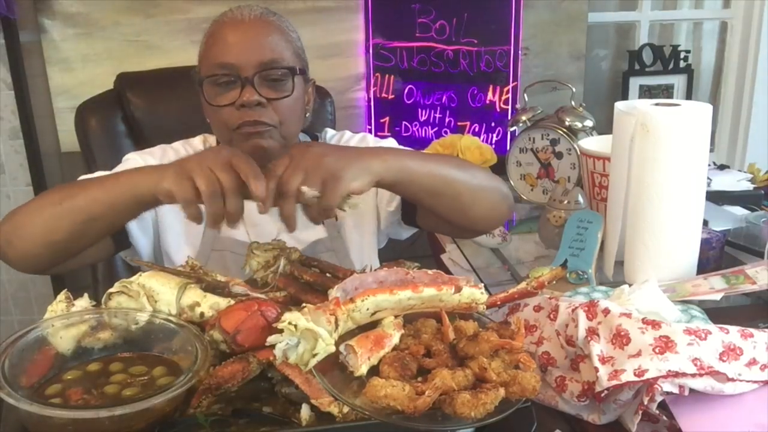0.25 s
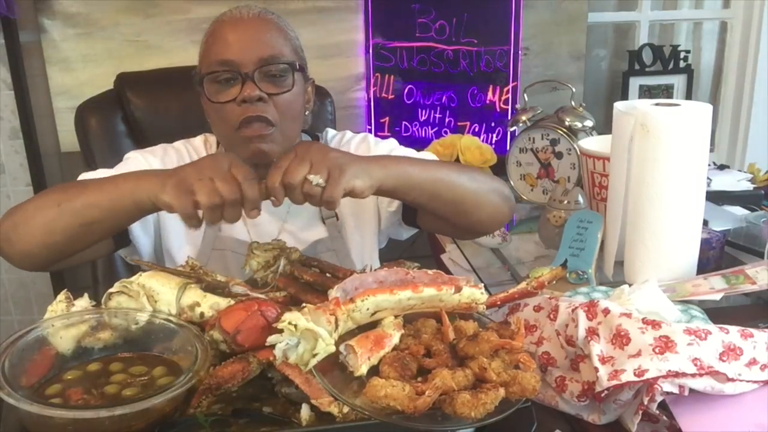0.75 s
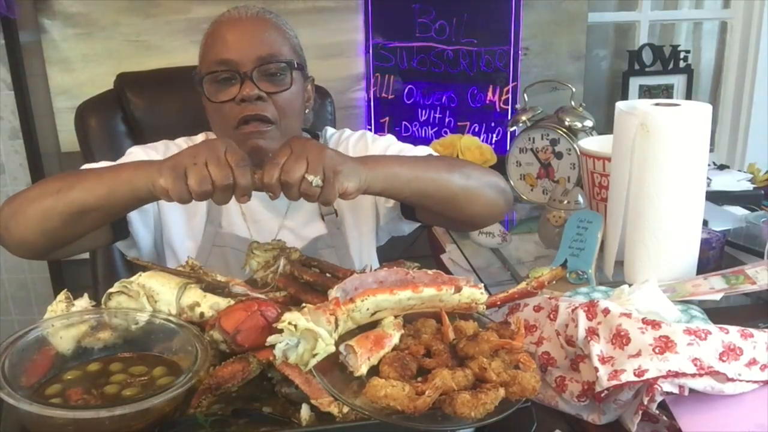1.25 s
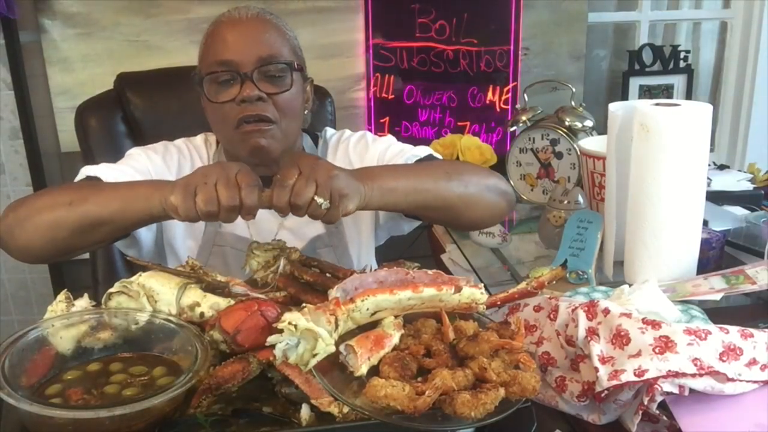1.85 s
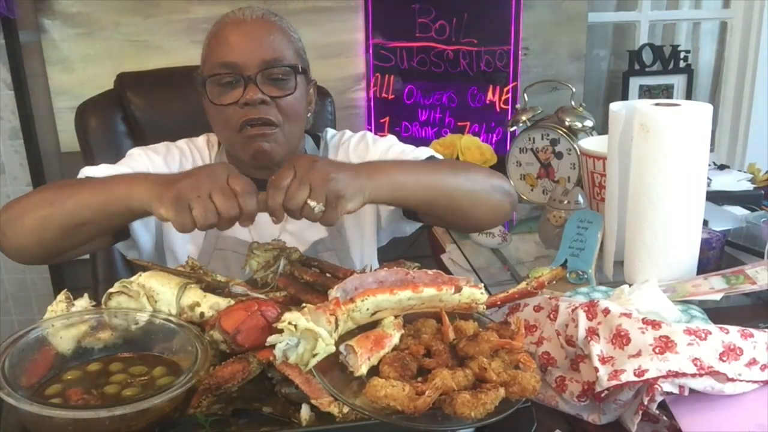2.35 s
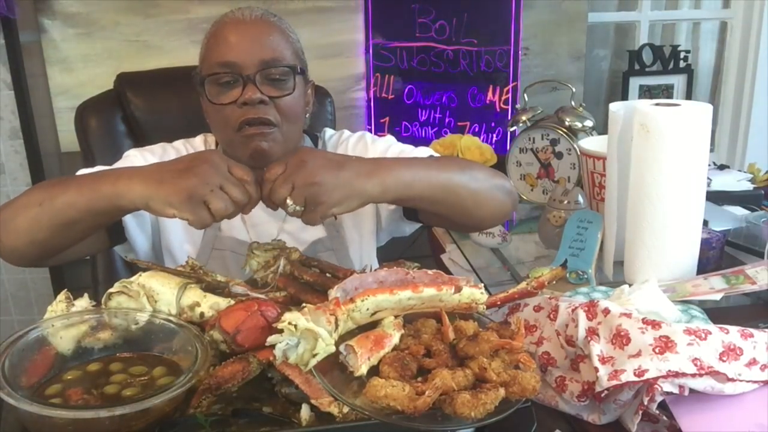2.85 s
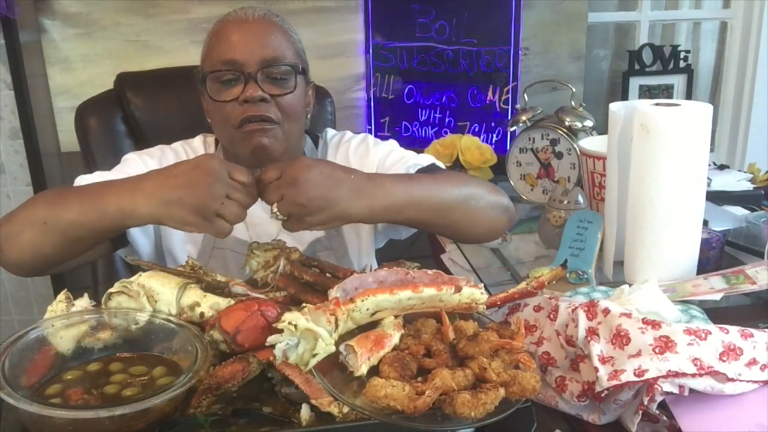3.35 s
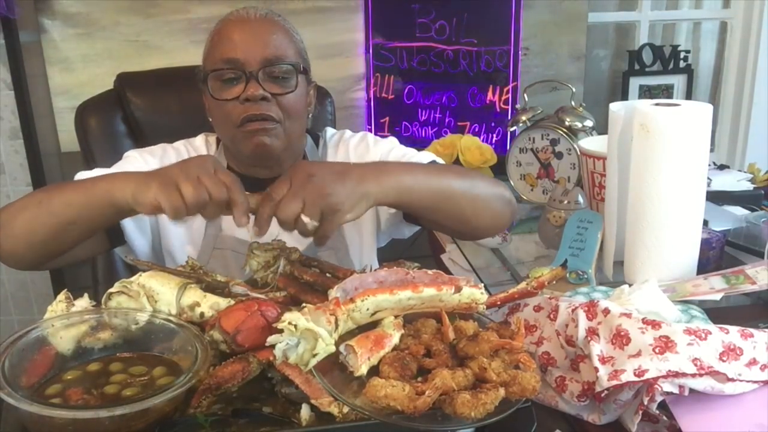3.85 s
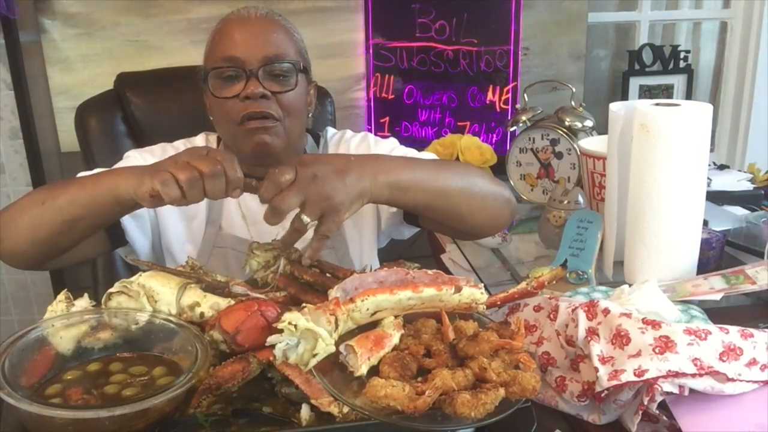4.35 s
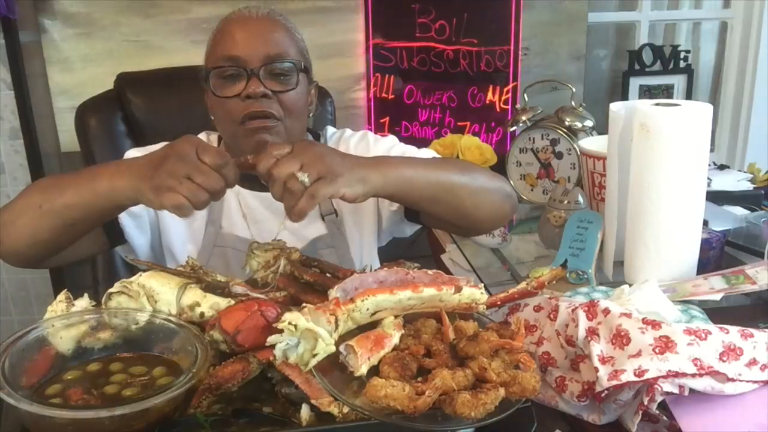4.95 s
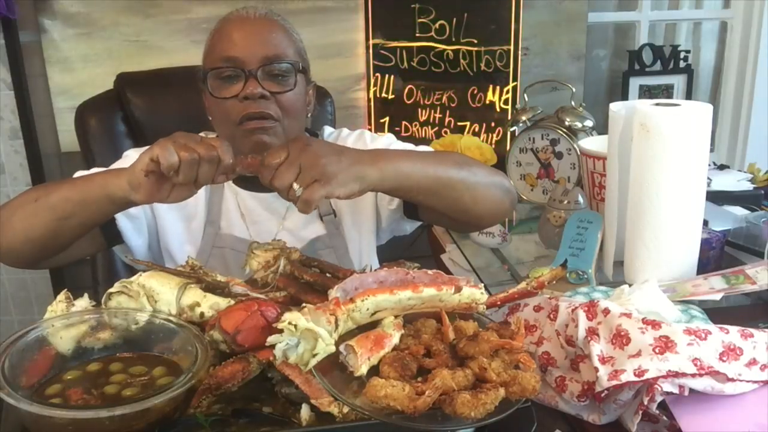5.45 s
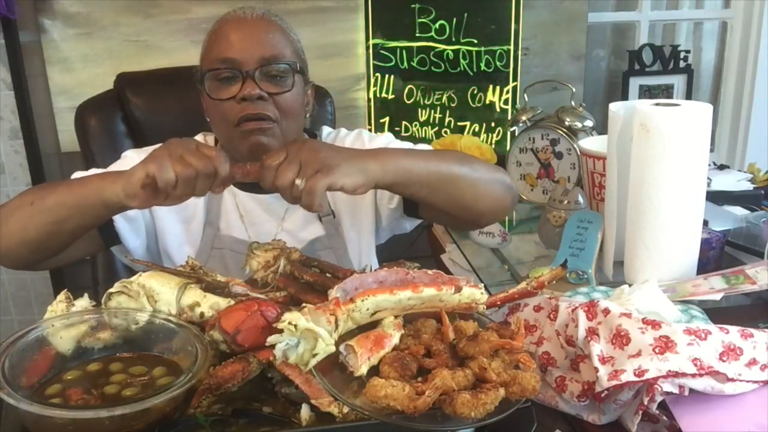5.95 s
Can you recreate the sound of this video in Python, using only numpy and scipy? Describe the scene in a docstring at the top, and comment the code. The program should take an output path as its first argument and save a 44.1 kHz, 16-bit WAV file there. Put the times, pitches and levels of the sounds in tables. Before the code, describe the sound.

A steady low hum with a slow throb sits under soft rumble and air. Small dull pops patter irregularly, singly and in quick runs, with faint hollow knocks. Close up, hard shell ticks and cracks, bursts into a single sharp snap near the two-second mark, then splinters more softly. The lively small room gives the snap a short bright tail. Weak crackles return near the end, and a distant bird chirps barely audibly.

```python
"""Crab leg cracked by hand

A crab leg is bent by hand until its shell ticks, snaps once loudly and is pulled apart.
Each crack is a rush of tiny tears that rings the leg, and the hard-walled room rings after it.
Behind it hum tones beat over a rumble and airy noise, and short blips patter like a simmering pot
among faint hollow knocks. A far bird gives a few faint chirps, made of tones that slide upward."""
import sys
import numpy as np
from scipy import signal
from scipy.fft import rfft, irfft
from scipy.io import wavfile
from scipy.ndimage import uniform_filter1d

SR = 44100
rng = np.random.default_rng(int(sys.argv[2]) if len(sys.argv) > 2 else 0)


def transcribe(u):
    """Save the signal u as a 16-bit wav file named by the first command-line argument.

    u: samples, shape (n,) or (channels, n), limited to [-1, 1]; the rate is SR.
    q: integer samples, one column per channel.
    """
    v = np.clip(np.atleast_2d(u).T, -1, 1)
    q = np.round(v * 32767).astype(np.int16)
    wavfile.write(sys.argv[1], SR, q)


N = 272979  # length in samples
T = np.arange(N) / SR  # time in s
BINS = np.fft.rfftfreq(4096, 1 / SR)  # frequencies in Hz at which filters are drawn

# Cracks of the shell, the big snap among them; shell() raises all levels alike:
# t/s, body level/dB, edge level/dB, splinter level/dB, ring of the broken piece f/Hz
CRACKS = [(0.7169,-53,-55,-74,4400), (0.8066,-40,-45,-48.5,3600), (0.8104,-43,-60,-65,3220),
          (1.6365,-32,-39,-37.5,3740), (1.677,-45,-49,-62,4220), (1.7884,-48,-47.5,-47,4200),
          (1.8487,-39.5,-43,-48,4150), (1.854,-40,-35.5,-45,4340), (1.902,-30,-46.5,-60.5,3156),
          (1.9019,-45.5,-71,-31.5,15200), (1.955,-45,-55,-66,3520), (2.11,-50,-48,-58,3200),
          (2.116,-42,-41,-36,6520), (2.1383,-33,-34,-38,6400), (2.1458,-14,-12,-22.5,3120),
          (2.568,-39,-38.5,-42.5,4660), (2.7061,-47.5,-46,-43,6030), (2.8006,-46,-44.5,-41.5,3360),
          (2.8901,-37.5,-37.5,-36,5040), (3.1932,-63,-54.5,-64,5185), (5.5076,-42.5,-50.5,-73,4080),
          (6.0256,-45,-60,-76.5,3890), (6.177,-44.5,-49.5,-48.5,3290)]
# The body, edge and splinter bands of a crack: lower f/Hz, upper f/Hz
CRACK_BANDS = [(2400, 4600), (4600, 9500), (9500, 16000)]
# Basic colour of breaking shell, before the bands are set: f/Hz, relative level/dB per Hz
SHELL = [(250, -33.5), (450, -32), (750, -15.5), (1200, -16), (1600, -10.5), (2200, -2), (3400, -3),
         (5000, -5), (7000, -1.5), (10000, -9.5), (14500, -12), (16500, -18)]
# Ring of the hollow leg: f/Hz, width f/Hz, boost level/dB
RING = [(4030, 940, 4), (6900, 380, 0), (11060, 230, -1)]
# A usual tiny tick of rubbing shell: body level/dB, edge level/dB, splinter level/dB
CRUMB_DB = (-75, -71.5, -73.5)

# The clear single pops; pop() shifts the level: t/s, blip level/dB, pitch f/Hz
POPS = [(0.0264,-20.5,1550), (0.1491,-32.5,1660), (0.383,-39,1790), (0.3939,-30,1750), (0.57,-34,1480),
        (1.261,-39,1580), (1.6296,-33,1920), (1.6366,-31.5,2005), (1.7856,-33,1810), (2.0503,-36.5,1540),
        (2.1138,-27,1800), (2.5077,-28,1640), (2.707,-40,1620), (2.997,-31,1570), (3.5213,-36.5,1566),
        (3.565,-33,1700), (3.7351,-34.5,1666), (3.9404,-36,1430), (4.0768,-31.5,1554), (5.1172,-35.5,1765),
        (5.385,-33,1506), (5.5196,-36.5,1733), (5.8868,-36.5,1824), (5.9927,-31,1810), (6.0534,-29,1546)]
# Flurries, quick runs of pops; pop() shifts the levels:
# start t/s, length t/s, blip level/dB, low knock level/dB
FLURRIES = [(.019,0.07,-44.5,-51), (.249,0.023,-36.5,-60), (.525,.015,-42,-44), (0.714,0.0091,-34,-30.5),
            (1.058,0.034,-33,-33), (1.382,0.014,-43,-48), (1.436,.025,-38,-47), (1.682,0.039,-37.5,-39.5),
            (1.815,0.027,-41.5,-42.5), (2.096,0.019,-34,-38.5), (2.309,0.034,-36.5,-40.5),
            (2.412,0.014,-35,-54), (2.626,0.044,-40,-36.5), (2.731,0.032,-44.5,-57),
            (3.154,0.053,-49.5,-48.5), (3.344,0.054,-44,-53), (4.154,0.0231,-48,-36), (4.427,0.016,-39,-45),
            (4.529,0.1,-43.5,-45.5), (5.006,0.019,-37.5,-36), (5.152,.015,-39.5,-46.5),
            (5.303,0.038,-35.5,-41.5), (5.43,0.018,-40,-37), (5.697,0.011,-38,-52.5)]
# The faint tick that opens a flurry: body level/dB, edge level/dB, splinter level/dB
FLURRY_TICK_DB = (-58, -66, -72)
# Colour of the small pops: f/Hz, relative level/dB per Hz
PATTER_COLOUR = [(150, -32), (330, 0), (480, -9), (620, 4.5), (850, -7), (1020, 1.5), (1170, -12.5),
                 (1500, 6), (2000, -3.5), (2400, -5), (2900, -20), (4200, -20), (8000, -32), (16000, -51.5)]
# The clearest hollow knocks: t/s, level/dB before the soft onset and fade, pitch f/Hz
KNOCKS = [(1.11,-43.5,401), (2.325,-45,620), (2.746,-46.5,323), (4.171,-49,560), (4.436,-46,377),
          (4.687,-44.5,333), (5.429,-40.5,1030)]
# Bird chirps; scene() lowers all of them alike: t/s, level/dB
CHIRPS = [(1.72, -49.5), (2.05, -47.5), (2.985, -50.5), (3.315, -51.5), (3.655, -50)]

# How long the room rings at each pitch, down to -60 dB: f/Hz, t/s
ROOM_T60 = [(300, 0.27), (1500, 0.23), (3200, .5), (7000, .52), (10000, .38), (16000, 0.5)]
# Colour of the room's tail at its start: f/Hz, relative level/dB
ROOM_COLOUR = [(300, -5.5), (1500, -2), (2300, -6), (3200, -2), (4500, -2), (7000, -4), (9000, 0),
               (16000, 1)]
# Echoes from the table and near walls: delay t/s, gain
ECHOES = [(.0092, .15), (.011, 0.2), (.0178, .08), (.0203, .09)]
# Colour of the low rumble: f/Hz, relative level/dB per Hz
RUMBLE = [(25, -18.5), (45, -7.5), (70, 1), (100, -2.5), (150, -2), (200, -6.5), (260, -21), (500, -44)]
# Colour of the airy background noise: f/Hz, relative level/dB per Hz
AIR = [(150, -33.5), (260, 2), (400, 3.5), (650, -2), (1100, -5.5), (1600, -5.5), (2050, -5.5), (2800, -10),
       (4500, -14), (7000, -14), (10300, -23), (12000, -21), (16000, -31)]

POP_LOW_DB = -15.5  # low knock under a single pop against its blip, before pop() shifts both
BLIP_HZ, BLIP_SPREAD_HZ = 1700, 170  # usual pitch of a pop, and its scatter
FLURRY_GAP_S, FLURRY_JITTER_S = 0.013, .002  # spacing of the pops in a run, and its unevenness
FLURRY_SPREAD_DB = 1  # how unequal the pops in a run are
PATTER_DB = -57  # middle level of the fine patter
PATTER_SWELL_DB, PATTER_SWELL_HZ = 4.5, 12  # how strongly and how fast it comes and goes
PATTER_LIFT_DB, PATTER_LIFT_S = 5.5, 0.02  # rise around a flurry, and extra reach on each side
HUM_HZ, HUM_DB = 119.8, -42.5  # twice the mains frequency; rms level without waver and beat
BEAT_HZ, BEAT_DB = 1.155, -14.5  # the motor's slip, and the level of its tone under the hum
BEAT_PEAK_S = 0.44  # a moment when the beat is loudest
AIR_DB = -60.5  # rms level
EDGE_HZ = 16000  # top of the final sound


def shell(crack_db=1.5, splinter_db=-15, splinter_wait=.025, give_db=-23):
    """The shell gives a little just before each crack, and sheds two splinters after it."""
    out = np.zeros(N)
    for s, *levels_db, piece_hz in CRACKS:
        add(out, s, amp(crack_db) * fracture(levels_db, piece_hz))
        small_db = np.minimum(levels_db, -33)
        give_s = s - rng.uniform(0.0011, .0018)
        add(out, give_s, amp(give_db) * fracture(small_db, piece_hz))
        for wait in rng.exponential(splinter_wait, size=2):
            size_db = small_db + 2 * rng.standard_normal(len(small_db))
            splinter = fracture(size_db, rng.uniform(4600, 18000), t60=0.0064)
            add(out, s + wait, amp(splinter_db) * splinter)
    return out


def fracture(levels_db, piece_hz, t60=.014, first_db=4, span=0.0042, piece_db=7.5, piece_q=6):
    """One break and a dying rush of tiny tears ring the leg and the broken piece."""
    t = np.arange(2048) / SR
    tears = rng.standard_normal(len(t))
    tears[0] = amp(first_db)  # the first break
    tears = tears * amp(-60 * t / t60)
    power = abs(rfft(tears, 2 * len(t))) ** 2
    modes = [*RING, (piece_hz, piece_hz / piece_q, piece_db)]
    ringing = sum(db / (1 + (2 * (BINS - hz) / width) ** 2) for hz, width, db in modes)
    colour = read(SHELL, BINS) + ringing
    # even out the random colour of the tears: the tearing itself has no pitch
    colour = colour - 10 * np.log10(uniform_filter1d(power, size=35))
    # bring each band to its level, as if its energy were spread over the span in s
    bins_power = power * amp(colour) ** 2
    energy = [bins_power[(BINS > lo) & (BINS < hi)].sum() / len(t) for lo, hi in CRACK_BANDS]
    lift_db = np.array(levels_db) - 10 * np.log10(np.array(energy) / (span * SR))
    band_centres = np.mean(CRACK_BANDS, axis=1)
    colour = colour + read(np.column_stack([band_centres, lift_db]), BINS)
    return signal.fftconvolve(tears, causal(colour))


def crumbs(per_s=16, spread_db=3, coarse_per_s=2.5, coarse_db=(-58, -62, -70)):
    """Tiny ticks of shell rubbing between the fingers, now and then a coarser one."""
    out = np.zeros(N)
    for rate, usual_db in [(per_s, CRUMB_DB), (coarse_per_s, coarse_db)]:
        draws = rng.random((200, 5))[:int(rate * N / SR)]
        for slot, (place, piece, *bands) in enumerate(draws):
            # the root of 12 makes spread_db the standard deviation of an even draw
            size_db = spread_db * np.sqrt(12) * (np.array(bands) - .5) + usual_db
            tick = fracture(size_db, 3000 + 5800 * piece, t60=0.0077)
            add(out, (slot + place) / rate, tick)
    return out


def simmer(stray_db=-44, stray_low_db=-49, stray_spread_db=1.0, count=26):
    """Clear single pops, quick runs of them, and soft strays in between."""
    out = np.zeros(N)
    for s, db, pitch_hz in POPS:
        add(out, s, pop(db, pitch_hz, db + POP_LOW_DB))
    for slot, (size, pitch, low) in enumerate(rng.standard_normal((count, 3))):
        stray = pop(stray_db + stray_spread_db * size,
                    BLIP_HZ + BLIP_SPREAD_HZ * pitch,
                    stray_low_db + stray_spread_db * low)
        add(out, (slot + rng.random()) * N / SR / count, stray)
    for start, length, db, low_db in FLURRIES:
        add(out, start, fracture(FLURRY_TICK_DB, rng.uniform(2700, 4400), t60=0.023))
        for step, (late, size, pitch, low) in enumerate(rng.standard_normal((12, 4))):
            sound = pop(db + FLURRY_SPREAD_DB * size,
                        BLIP_HZ + BLIP_SPREAD_HZ * pitch,
                        low_db + FLURRY_SPREAD_DB * low)
            if step * FLURRY_GAP_S < length:
                add(out, start + step * FLURRY_GAP_S + FLURRY_JITTER_S * late, sound)
    return out


def pop(db, pitch_hz, low_db, pop_db=2.0, knock_db=-1):
    """One pop: a short blip over a lower knock."""
    high = amp(db + pop_db) * blip(pitch_hz, width_hz=490)
    low = amp(low_db + knock_db) * blip(rng.uniform(500, 850), width_hz=520)
    return high + low


def blip(hz, width_hz, top_hz=2400):
    """A dull, short ring around one pitch, with little treble and a peak of 1."""
    resonance = 1 + (2 * (BINS - hz) / width_hz) ** 4
    treble_cut = 1 + (BINS / top_hz) ** 14
    bass_cut = BINS / (BINS + hz)
    shape = bass_cut / np.sqrt(resonance * treble_cut)
    sound = causal(20 * np.log10(shape + 1e-6))
    return sound / abs(sound).max()


def patter(per_s=200, spread_db=4, ragged_db=4, detune=0.081):
    """Small pops, each kind coloured a little differently, thicken around the flurries."""
    fine, count = np.zeros(N), 24  # count: kinds of pop
    for scale in np.exp(np.linspace(-detune, detune, count)):
        rough = uniform_filter1d(rng.standard_normal(len(BINS)), size=10)
        ripple = unit(uniform_filter1d(rough, size=6))
        sizes = amp(spread_db * np.minimum(rng.exponential(1, N), 2.5))
        clicks = sizes * (rng.random(N) < per_s / count / SR)
        colour = read(PATTER_COLOUR, BINS * scale) + ragged_db * ripple
        fine += signal.oaconvolve(clicks, causal(colour))[:N]
    fine = unit(fine)
    # dividing by the recent loudness makes the patter more even
    loudness = np.sqrt(abs(uniform_filter1d(fine ** 2, size=2000)) + 0.099)
    busy = sum(np.exp(-((T - start - length / 2) / (length / 2 + PATTER_LIFT_S)) ** 2)
               for start, length, *_ in FLURRIES)
    swell_db = PATTER_SWELL_DB * drift(PATTER_SWELL_HZ)
    level_db = PATTER_DB + swell_db + PATTER_LIFT_DB * np.minimum(busy, 1)
    return amp(level_db) * fine / loudness


def knocks(t60=0.12, rise=0.0018, faint_db=-13):
    """Each knock is one low, briefly ringing tone; every flurry sets off a faint one too."""
    out, t = np.zeros(N), np.arange(SR // 4) / SR
    faint = [(start + length / 2, low_db + faint_db, rng.uniform(320, 720))
             for start, length, _, low_db in FLURRIES]
    for s, db, hz in KNOCKS + faint:
        envelope = amp(db - 60 * t / t60) * (1 - np.exp(-t / rise))
        add(out, s, envelope * np.sin(2 * np.pi * hz * t))
    return out


def bird(start_hz=2230, end_hz=2540, length=0.098):
    """Each chirp is a tone sliding upward, at a slightly different pitch each time."""
    out = np.zeros(N)
    slide = np.linspace(start_hz, end_hz, round(length * SR))
    for s, db in CHIRPS:
        hz = slide * (1 + 0.0053 * rng.standard_normal())
        tone = np.sin(2 * np.pi * np.cumsum(hz) / SR)
        add(out, s, amp(db) * tone * np.hanning(len(hz)))
    return out


def room(x, wet_db=-4, gap=0.003):
    """A few near echoes and a dense tail that dies at its own pace at each pitch."""
    hz, t, z = signal.stft(rng.standard_normal(SR), SR, nperseg=256)
    fall_db = -60 * t / read(ROOM_T60, hz)[:, None]
    tail = signal.istft(z * amp(fall_db + read(ROOM_COLOUR, hz)[:, None]), SR, nperseg=256)[1]
    # the tail grows in over the first gap seconds
    tail = tail * np.clip(np.arange(len(tail)) / SR / gap, 0, 1) ** 2
    tail = amp(wet_db) * tail / np.linalg.norm(tail)
    for delay, gain in ECHOES:
        add(tail, delay, np.array([gain]))
    return signal.fftconvolve(x, tail)[:N]


def appliance(mains_db=-63, waver_db=0.78, rumble_db=-54):
    """A motor slips just behind the mains hum, so the two beat slowly over its rumble."""
    slipping = amp(BEAT_DB) * np.exp(-2j * np.pi * BEAT_HZ * (T - BEAT_PEAK_S))
    both_tones = ((1 + slipping) * np.exp(2j * np.pi * HUM_HZ * T)).imag
    hum = amp(HUM_DB + waver_db * drift(6.9)) * both_tones
    mains = amp(mains_db) * np.sin(np.pi * HUM_HZ * T)  # half the hum's pitch
    # the root of 2 turns rms levels into sine peaks
    return np.sqrt(2) * (hum + mains) + amp(rumble_db) * noise(RUMBLE)


def noise(points):
    """Steady noise of rms 1 with a given spectrum."""
    gain = amp(read(points, np.fft.rfftfreq(N, 1 / SR)))
    return unit(irfft(rfft(rng.standard_normal(N)) * gain, N))


def drift(rate_hz):
    """Slow random wander of rms 1: noise with everything faster than rate_hz weakened."""
    slowing = 1 + (np.fft.rfftfreq(N, 1 / SR) / rate_hz) ** 4
    return unit(irfft(rfft(rng.standard_normal(N)) / slowing, N))


def causal(db, size=2048):
    """The sharp-fronted (minimum-phase) impulse response with this gain in each bin."""
    log_gain = np.log(amp(np.maximum(db, db.max() - 90)))
    circle = np.concatenate([log_gain, log_gain[-2:0:-1]])
    return np.fft.ifft(np.exp(np.conj(signal.hilbert(circle)))).real[:size]


def read(points, hz):
    """Joins (Hz, value) points by lines on a log-frequency axis."""
    f, value = np.transpose(points)
    return np.interp(np.log(hz + 1), np.log(f + 1), value)


def amp(db):
    """Decibels to gain."""
    return 10 ** (np.asarray(db) / 20)


def unit(x):
    """Scales to rms 1."""
    return x / np.sqrt(np.mean(x ** 2) + 1e-20)


def add(mix, s, sound):
    """Mixes a sound in at time s in seconds."""
    part = mix[max(round(s * SR), 0):][:len(sound)]
    part += sound[:len(part)]


def scene(pop_room_db=-8, bird_db=-4):
    """Shell, pops and bird share one room, the pops ringing it less; hum and air stay dry."""
    cracks = shell() + crumbs()
    pops = simmer() + patter() + knocks()
    chirps = amp(bird_db) * bird()
    steady = appliance() + amp(AIR_DB) * noise(AIR)
    ringing = room(cracks + chirps + amp(pop_room_db) * pops)
    return (cracks + pops + chirps + ringing + steady)[None]


def record(dry):
    """Peaks beyond full scale are cut flat, then everything above the top edge is filtered off."""
    clipped = np.clip(dry, -1, 1)
    lowpass = signal.firwin(301, EDGE_HZ, window=("kaiser", 8), fs=SR)
    return signal.oaconvolve(clipped, lowpass[None], "same")


dry = scene()
out = record(dry)
transcribe(out)
```